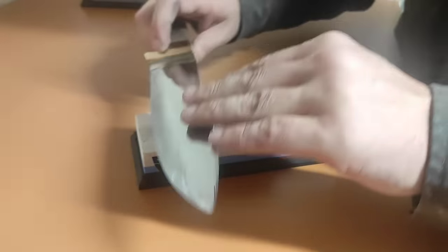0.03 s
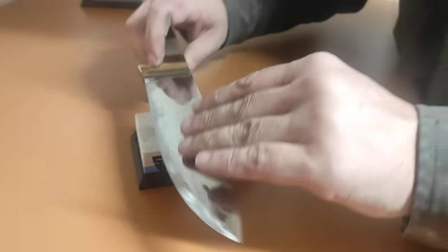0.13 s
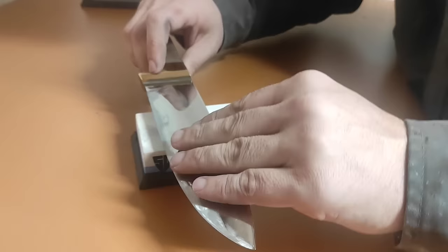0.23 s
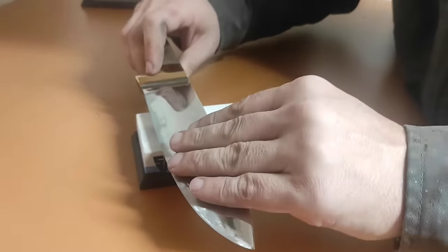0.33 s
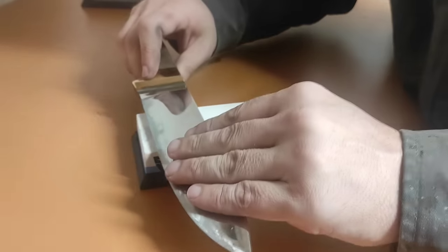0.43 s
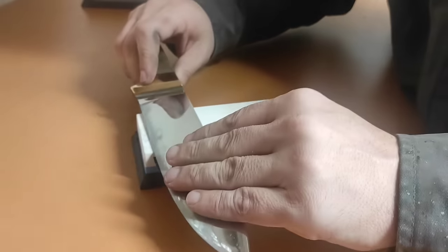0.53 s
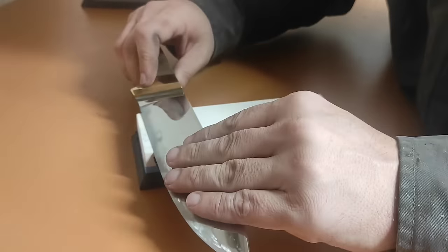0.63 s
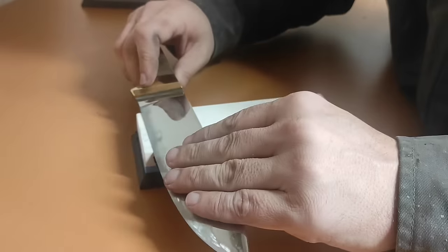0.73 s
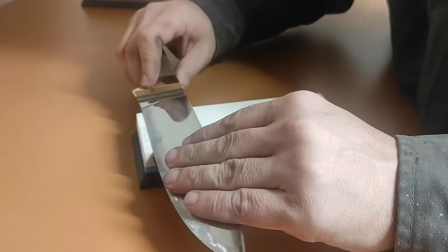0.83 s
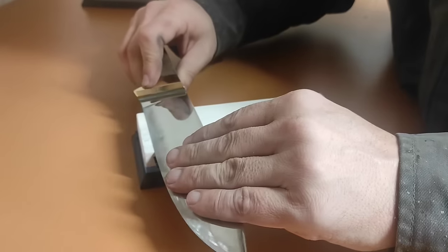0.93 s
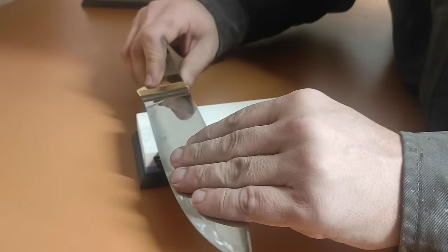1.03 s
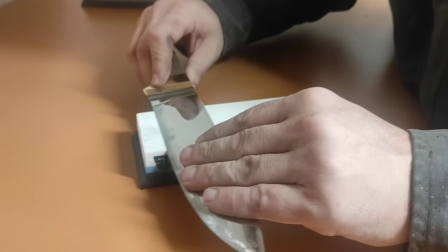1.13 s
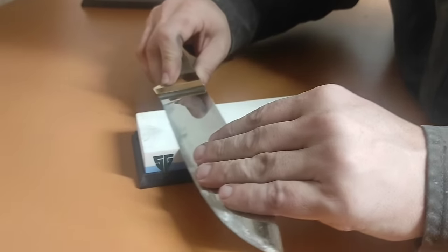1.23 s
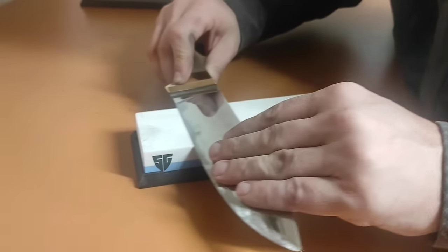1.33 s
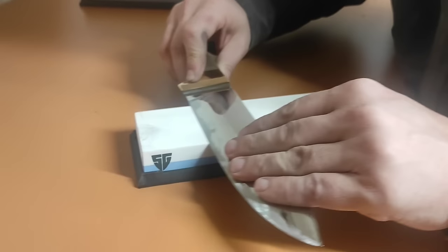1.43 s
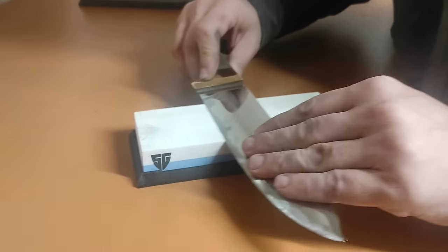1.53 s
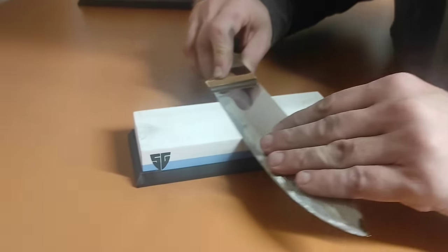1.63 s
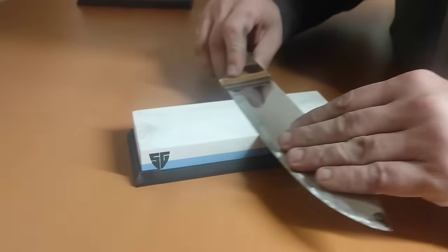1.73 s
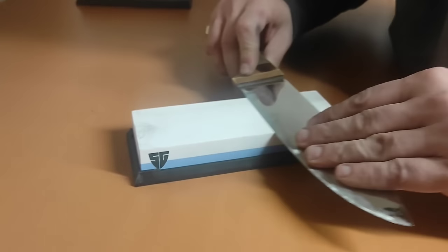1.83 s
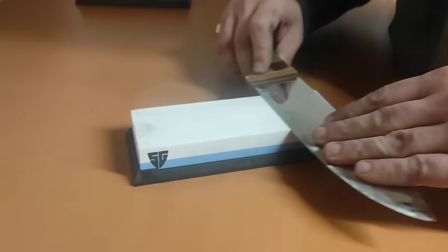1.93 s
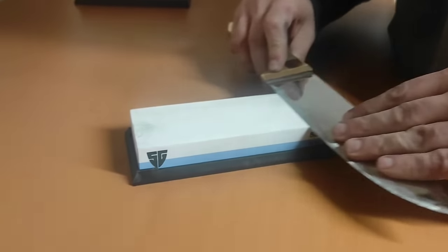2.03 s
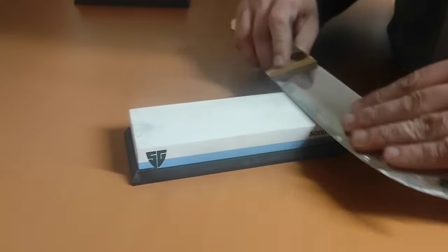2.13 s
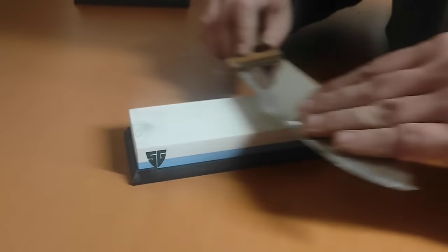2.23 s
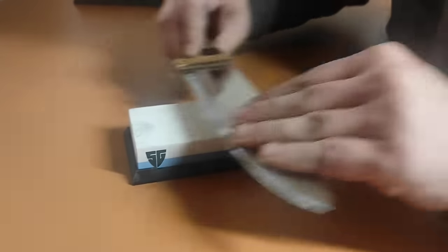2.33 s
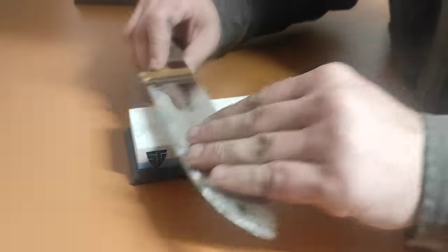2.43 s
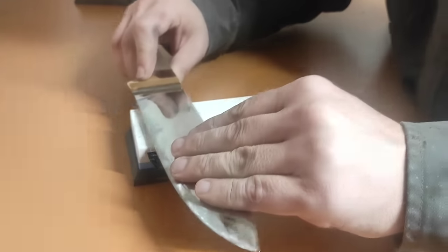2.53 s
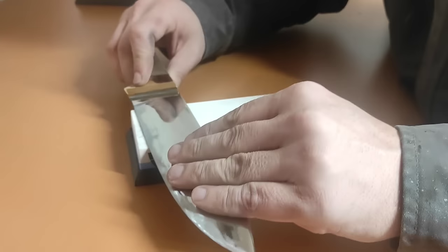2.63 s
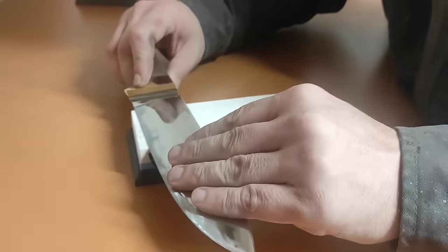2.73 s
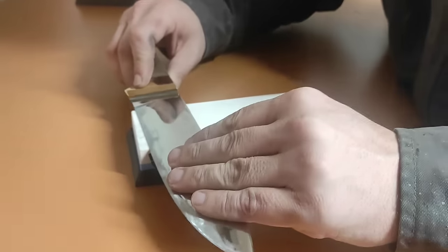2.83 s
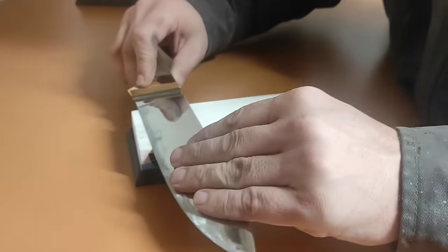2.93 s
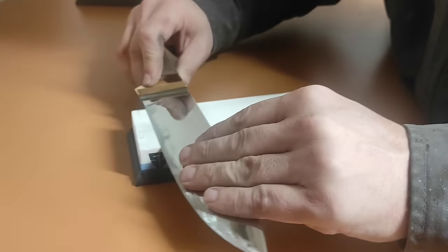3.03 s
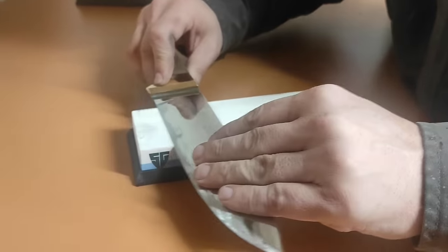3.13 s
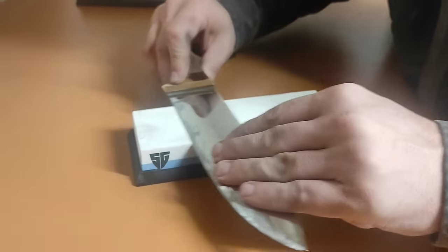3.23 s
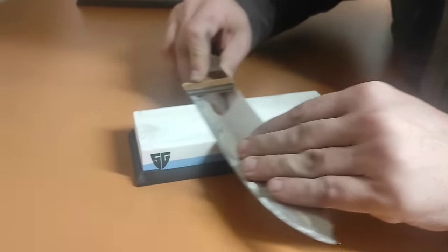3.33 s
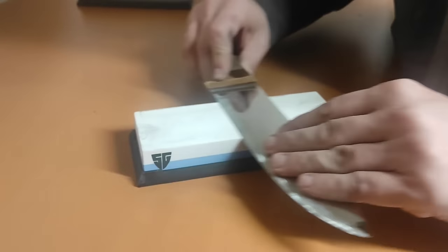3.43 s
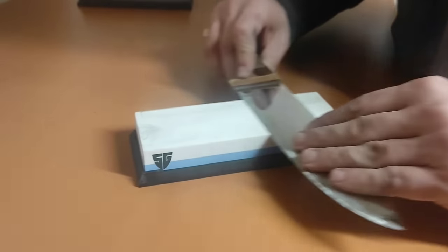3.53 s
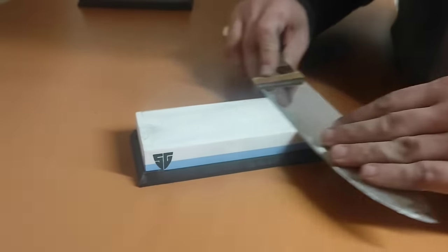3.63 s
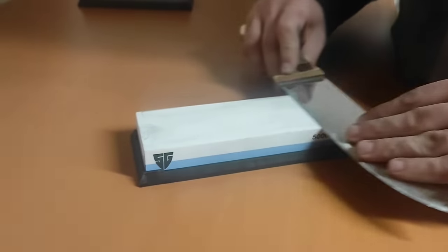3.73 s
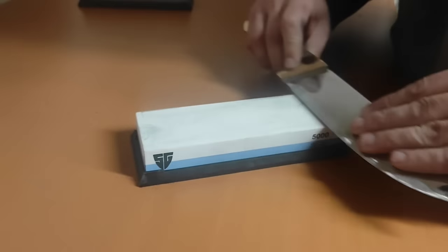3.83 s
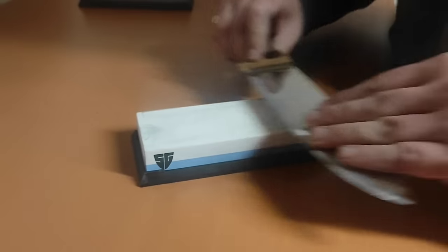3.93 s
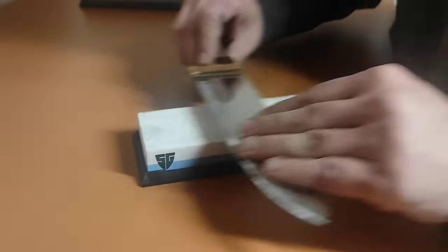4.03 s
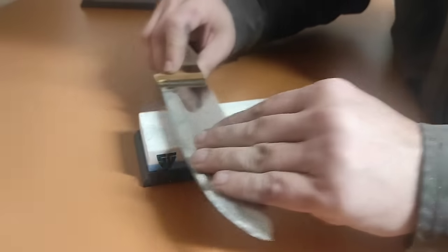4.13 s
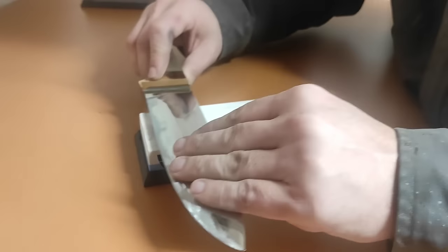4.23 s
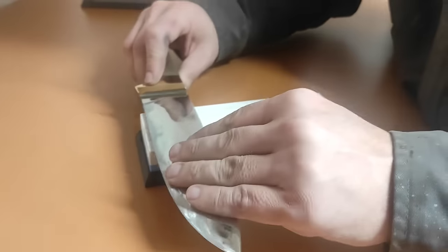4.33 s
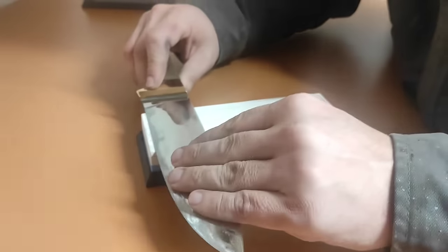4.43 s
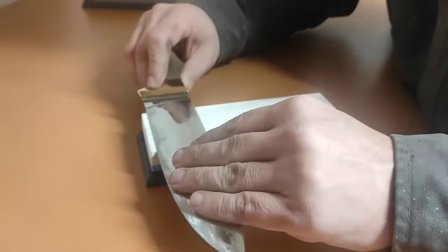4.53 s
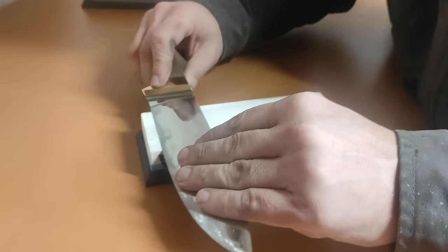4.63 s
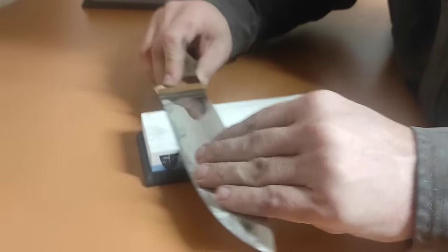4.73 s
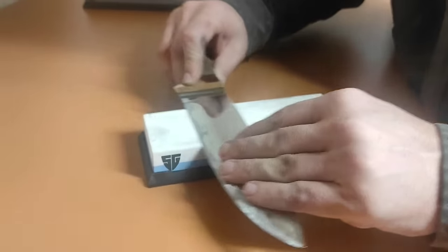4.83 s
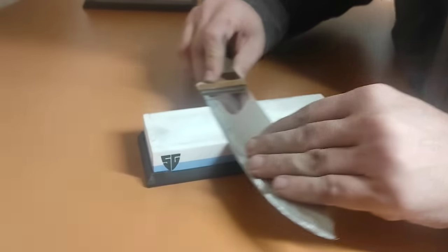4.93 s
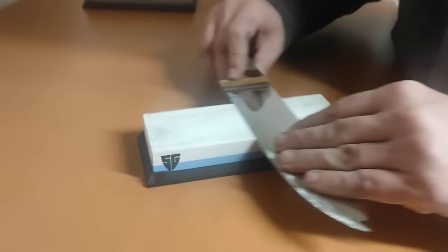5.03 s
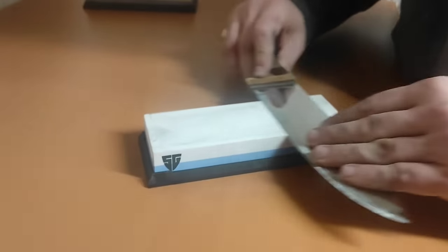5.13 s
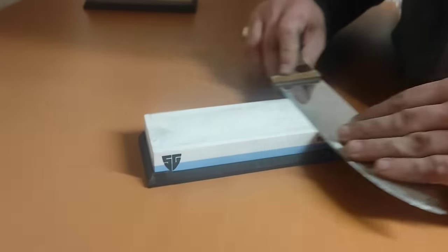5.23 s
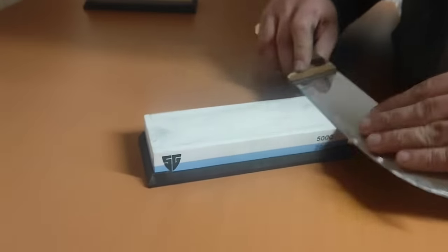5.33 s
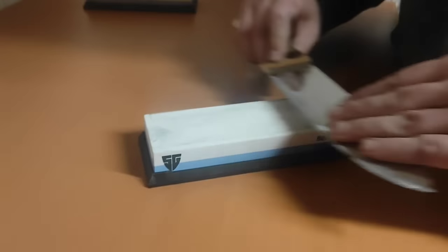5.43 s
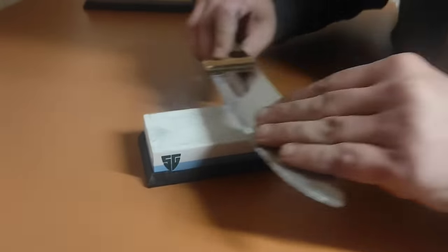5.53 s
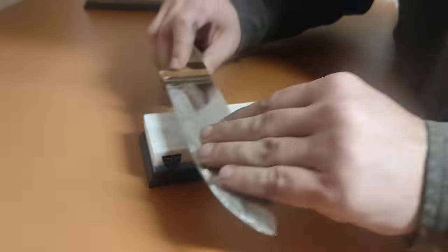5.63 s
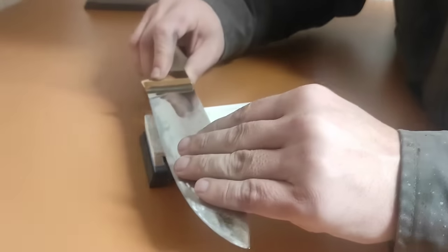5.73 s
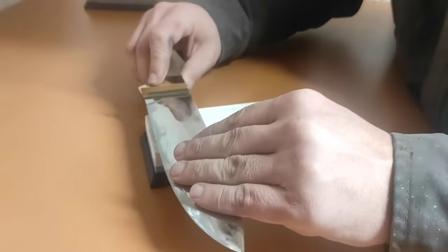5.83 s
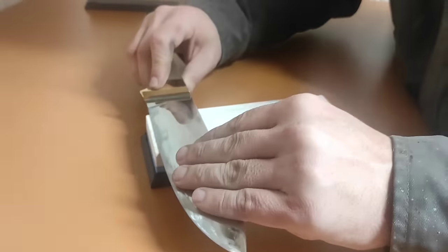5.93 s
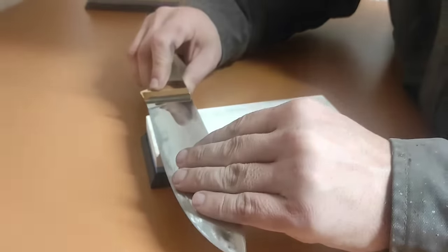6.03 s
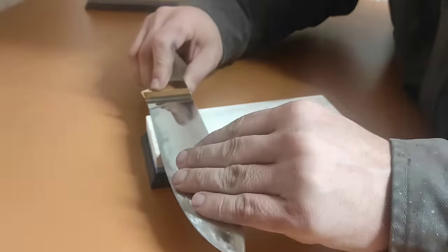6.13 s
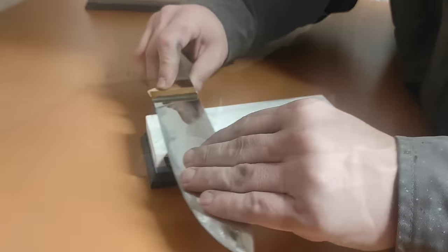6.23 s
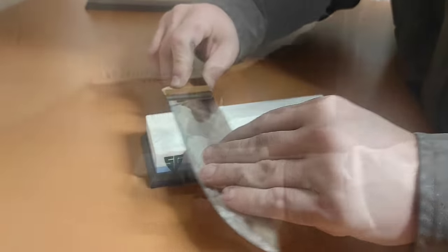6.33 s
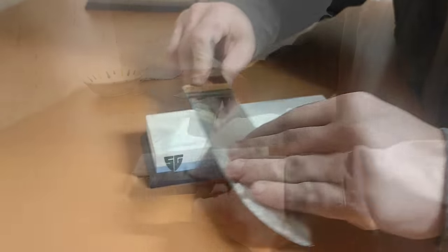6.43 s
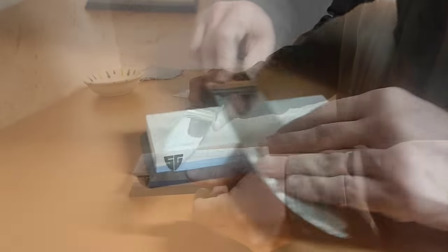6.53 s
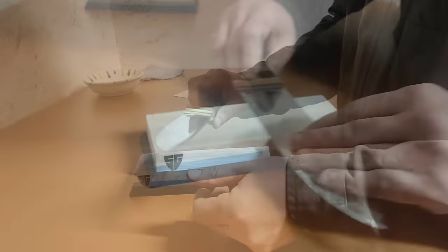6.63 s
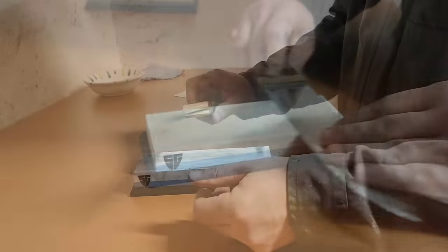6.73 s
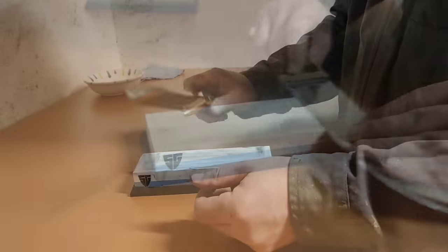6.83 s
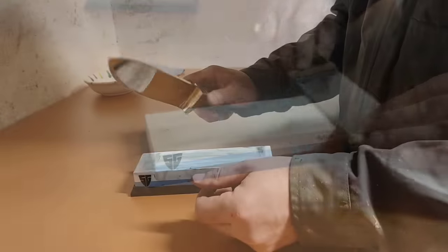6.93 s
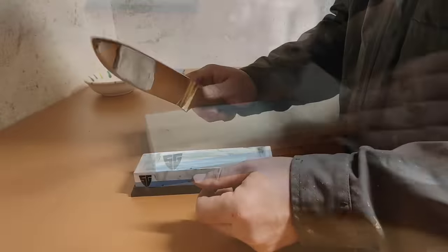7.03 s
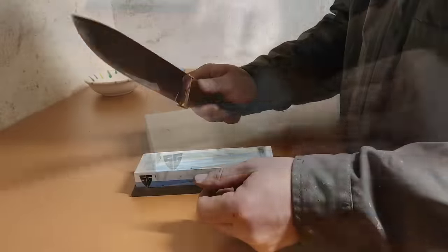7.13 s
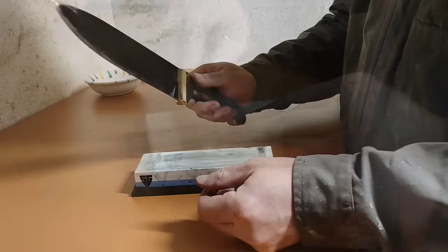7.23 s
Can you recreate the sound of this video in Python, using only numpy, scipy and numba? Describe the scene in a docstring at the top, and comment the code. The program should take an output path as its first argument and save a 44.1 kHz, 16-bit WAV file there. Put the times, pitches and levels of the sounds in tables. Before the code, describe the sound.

Close stereo view of knife sharpening at a table in a still room. After a short low wooden shudder and light finger taps, four steel-on-stone strokes of about a second each swell into high, wavering ringing hiss. Between them come quiet sleeve rustle and clear clacks as the blade is set back on the stone. The first stroke is longest, with a thin squeak midway; the last lifts off softly.

```python
"""First a stone's base judders briefly on a wooden table in a quiet small room; then soft brushing and knocks.
A large knife is drawn four times across the whetstone, with a bright, singing scrape.
Grit noise excites blade resonances that shift as the contact travels from heel to tip; damped modes make
the knocks and taps. The table rumbles as filtered noise and hums in wavering tones; brushing is coloured noise.
Two microphone ports close by hear the sources, the knife with a short diffuse reverberation."""
import sys
import numpy as np
from scipy import signal
from scipy.fft import rfft, irfft
from scipy.io import wavfile
from scipy.ndimage import map_coordinates
from numba import njit

SR = 44100
rng = np.random.default_rng(int(sys.argv[2]) if len(sys.argv) > 2 else 0)


def dump(signal):
    """Clip the signal to [-1, 1] and save it as 16-bit WAV at the path in sys.argv[1]."""
    limited = np.clip(np.atleast_2d(signal).T, -1, 1)
    pcm = np.round(limited * 32767).astype(np.int16)
    wavfile.write(sys.argv[1], SR, pcm)


N = 321930
TIME = np.arange(N) / SR

# All levels are relative: the functions weight the layers further. Resonance frequencies are nominal.
# Still air of the room: f/Hz, level/dB
AIR_SPECTRUM = [(20, 3.5), (37, -3), (50, -14), (66, -0.5), (120, -22.5), (250, -25), (500, -19),
                (1000, -31), (2500, -36), (8000, -38), (11000, -45), (15000, -67)]
# Low rumble that hands and arms stir in the table: t/s, level/dB; then its spectrum: f/Hz, level/dB
HAND_LEVELS = [(0, -54), (.8, -67.5), (2.4, -58.5), (4.2, -62), (5.7, -59.5), (6.85, -75), (7.3, -68)]
HAND_SPECTRUM = [(40, -5.5), (70, 1.5), (120, -16.5), (195, 3), (290, -2.5), (450, -15.5), (1000, -23.5),
                 (3000, -40), (12000, -73)]
# Soft brushing: sleeves and fingers between strokes, and the edge rubbing faintly as it settles on the stone:
# start t/s, end t/s, level/dB; then its spectrum: f/Hz, level/dB
BRUSHES = [(0.094, 0.493, -72.5), (0.835, 0.9, -68.5), (2.201, 2.628, -63.5), (2.477, 2.5, -64.5),
           (2.696, 2.88, -70.5), (3.9, 4.308, -64.5), (4.143, 4.26, -66.5), (4.473, 4.572, -59),
           (5.412, 5.847, -64), (6.013, 6.1, -67.5), (7.07, 7.3, -73.5)]
BRUSH_SPECTRUM = [(60, -30), (200, -8), (450, 1), (900, 1), (2200, 1.5), (3200, -4.5), (5000, -1),
                  (7000, -2), (8800, 0), (11000, -14.5), (15000, -36)]
BRUSH_RISE_S, BRUSH_SAG_DB_PER_S, BRUSH_RELEASE_DB_PER_S = 0.019, 15, 193

# Resonances of the table under the stone: f/Hz, nominal width/Hz, level/dB
TABLE_RESONANCES = [(94.2, 7.2, 2), (158, 76, 1), (190.6, 8.3, 7.5), (253.4, 44, -1.5), (298.2, 11, 4),
                    (393, 102, -12), (450, 12, -39), (746, 44, -10), (859, 24, -12.5), (1101, 137, -11)]
# Judders of the stone's base, and last the knife tip's thud on the table as it leaves the stone, # each full
# between two moments: start t/s, end t/s, hum level/dB, rattle level/dB
JUDDERS = [(0.0, 0.033, -31, -37.5), (4.915, 4.956, -40, -42.5), (5.328, 5.353, -47, -64)]
JUDDER_RISE_DB_PER_S, JUDDER_FALL_DB_PER_S = 215, 128
# Tones of the juddering table, the first the hum, the rest the rattle: mean f/Hz, level/dB
JUDDER_TONES = [(188, 4), (294, -3), (378, -17.5), (695, -22), (770, -18), (875, -21), (1030, -24.5)]
# Rubbing of the juddering base: f/Hz, level/dB
RUB_SPECTRUM = [(100, -2), (240, 2.5), (350, -1.5), (480, -15), (900, -13.5), (2000, -23), (5000, -35.5),
                (12000, -45)]

# Knocks, bounces and ticks of the blade, and taps of the fingers: t/s, knock level/dB, thump level/dB,
# tick level/dB, the spot's own ring f/Hz, clatter time t/s, own ring level/dB, treble cut-off f/Hz,
# lean between ports (positive to the left)
KNOCKS = [(0.31, -80, -71, -59, 1160, 0.0044, -7, 5000, -8),
          (0.552, -66, -52, -88, 790, 0.0033, -2, 1200, 2),
          (0.681, -46, -49.5, -62, 1130, 0.0052, 1.5, 1400, 5),
          (0.873, -88, -72, -53, 1230, 0.0054, -5, 4940, -4),
          (0.911, -97, -87, -56, 1160, 0.0036, 7, 5050, -11),
          (2.717, -29, -46, -53, 955, 0.0038, -20, 5500, 1),
          (2.741, -36, -55, -75, 1890, 0.0048, -4, 4000, -7),
          (2.878, -41.5, -38.5, -52.5, 2224, 0.006, -7.5, 1550, 0),
          (4.479, -26, -49.5, -41, 1207, 0.0044, -20, 5500, -5.5),
          (4.555, -59, -54, -48.5, 1230, 0.0035, -4, 5000, 2),
          (5.897, -54.5, -72, -93, 976, 0.0023, -5, 900, 2),
          (5.9368, -50.5, -48.5, -69, 960, 0.00086, -22, 1990, 15),
          (6.008, -36, -54, -56.5, 970, 0.004, -5.5, 1700, 0),
          (6.170, -72, -78, -56, 2250, 0.0049, -3, 4960, -1)]
# Struck modes of blade and stone, table, free blade, whole table top: f/Hz, level/dB, t60/s
KNOCK_MODES = [(520, 6.5, 0.057), (970, 2.5, 0.075), (1050, 0, 0.0088), (1264, -3.5, 0.018),
               (1690, 0, 0.051), (2220, 9.5, 0.025), (2454, 4, 0.029), (2866, 6, 0.065), (3715, 2, 0.06)]
THUMP_MODES = [(193, -4.5, 0.19), (308, 4, 0.06), (386, 0, 0.057)]
TICK_MODES = [(4960, -3, 0.076), (5330, -1, 0.036), (6140, 1, 0.05), (6480, -2.5, 0.052),
              (7310, -4.5, 0.07), (8420, -4, 0.07)]
BOOM_MODES = [(97.7, -1.1, 0.53), (135.4, -0.41, 0.51)]
# Spectra of the tick and of the base's dry click on the table: f/Hz, level/dB
TICK_SPECTRUM = [(1500, -10.5), (3600, -17), (4500, -11), (5400, -8.5), (6800, -1), (8500, 0),
                 (11000, -18.5), (15000, -42)]
CLICK_SPECTRUM = [(60, -12), (200, 15), (350, 1), (600, -8), (1100, -5), (2000, -14), (3700, -23.5),
                  (6000, -35)]
# Small bounces after a hit: level against the hit, decay time, unevenness
BOUNCE_DB, BOUNCE_S, BOUNCE_SPREAD_DB = -27.5, 0.012, 5.5
BOOM_DB, BOOM_RISE_S = -32.5, 0.01  # swing of the table top: offset from the knock level, build-up
MODE_DETUNE = 0.0108  # spread of mode frequencies from hit to hit, as a share

# Squeal midway through the first stroke: t/s, f/Hz, level/dB
SQUEAL_CURVE = [(1.45, 4210, -68), (1.487, 4170, -50), (1.53, 4220, -59), (1.563, 4180, -41),
                (1.6, 4070, -49), (1.65, 4230, -66)]
SQUEAL_WAVER, SQUEAL_STUTTER_DB = 0.011, 8  # share of its pitch; swing before levelling

# Tip rasping over the stone's edge: spectrum f/Hz, level/dB; then resonances f/Hz, nominal width/Hz, level/dB
RASP_SPECTRUM = [(100, -28), (250, -11), (500, 5.5), (850, 9.5), (1500, -1), (2150, 1.5), (2900, 6.5),
                 (3400, -25), (4000, 13), (5200, 3), (7500, 3), (8500, 8), (15000, -15)]
RASP_RESONANCES = [(995, 60, -6), (1500, 52, -2.5), (2285, 84, 13), (4556, 114, -3.5), (6770, 200, 3)]
RASP_RING_DB, RASP_IN_TABLE_DB = -1.5, -12  # ring against dry clicks; share that shakes the table

# Strokes from heel to tip: touch t/s, pressing-in time t/s, lift t/s, hiss level/dB, grinding level/dB,
# sizzle change towards the tip level/dB, tip rasp level/dB, bending resonance f/Hz, tip run-out t/s
STROKES = [(0.902, 0.32, 2.1453, -49, -55, -11, -36.5, 2200, 0.056),
           (2.877, 0.21, 3.835, -47.5, -52, 3.5, -44.5, 2273, 0.046),
           (4.51, 0.25, 5.374, -49.5, -56, 3, -40.5, 2324, 0.052),
           (6.051, 0.25, 6.955, -50, -61, -4, -73, 2318, 0.035)]
# Singing resonance, wandering with contact point and fingers, one curve a stroke: t/s, f/Hz, level/dB
SINGING_CURVES = [
    [(0.93, 6700, -61), (0.98, 6620, -54), (1.03, 6840, -53), (1.32, 6836, -37.5), (1.51, 6650, -43),
     (1.66, 6850, -41), (1.75, 6530, -39), (1.93, 6860, -38.5), (2.04, 6790, -39.5), (2.11, 6630, -42.5)],
    [(2.91, 6500, -51), (2.95, 6400, -50.5), (3.11, 6670, -49), (3.16, 7090, -40), (3.37, 6860, -38),
     (3.42, 7300, -41.5), (3.55, 6720, -39), (3.67, 7050, -34.0), (3.77, 7020, -38)],
    [(4.59, 6790, -56.5), (4.81, 7290, -40), (4.84, 7070, -44), (4.89, 6840, -37), (5.0, 6940, -39.5),
     (5.04, 7000, -46), (5.08, 6460, -37), (5.25, 7210, -38), (5.33, 7090, -40)],
    [(6.1, 6220, -67), (6.15, 6600, -69), (6.26, 6850, -44.5), (6.35, 7550, -36.5), (6.39, 6670, -40),
     (6.46, 6440, -42), (6.52, 6920, -35), (6.58, 6650, -41.5), (6.81, 6340, -43), (6.92, 7190, -47.5)],
]
# Second bending resonance, sliding with finger pressure, one curve a stroke: t/s, f/Hz, level/dB
SECOND_CURVES = [
    [(0.98, 4500, -82), (1.016, 4500, -64), (1.37, 4430, -60), (1.5, 4230, -56), (1.62, 4270, -51),
     (1.7, 4450, -48), (1.82, 4420, -49.5), (1.9, 4510, -46.5), (2.1, 4550, -47)],
    [(2.95, 4480, -53), (3.016, 4730, -48), (3.38, 4720, -56), (3.466, 4700, -51), (3.662, 4660, -51),
     (3.72, 4860, -51), (3.8, 4400, -39)],
    [(4.6, 4820, -63), (4.64, 4740, -53), (4.77, 5040, -57.5), (4.85, 4580, -51.5), (4.95, 4780, -55.5),
     (5.094, 4700, -44), (5.22, 4920, -49), (5.33, 4870, -40)],
    [(6.17, 4530, -75), (6.214, 4670, -53), (6.35, 4950, -54), (6.38, 4680, -46.5), (6.478, 4420, -47),
     (6.52, 4700, -49), (6.7, 4530, -46.5), (6.812, 4540, -42), (6.92, 4800, -56)],
]
# Core and skirt of those two resonances: width of each filter/Hz, level/dB
SING_SHAPE = [(340, -1), (1600, -18)]
SECOND_SHAPE = [(330, -2), (1200, -14)]
# Pressed blade at BEND_HZ, low, upper and short bending waves: f/Hz, nominal width/Hz, level/dB
BLADE_LOW = [(1010, 112, -5.5), (1583, 93, -5), (2229, 96, 4.5), (2424, 55, 4), (3000, 114, -3.5)]
BLADE_MID = [(5030, 190, -8)]
BLADE_HIGH = [(6330, 38, -0.5), (7855, 190, 1), (8680, 250, 2.5), (8967, 105, 1), (10610, 77, -5.5),
              (11430, 380, -13), (12600, 250, -25), (14100, 240, -19), (15760, 400, -17.5)]
# Stone and held heel, whose resonances do not follow the bend: f/Hz, nominal width/Hz, level/dB
STONE_RESONANCES = [(2990, 88, -5), (3350, 64, -13), (3723, 70, -1), (5540, 99, -13), (6200, 33, -10)]
# Broad noise of the grit and snap of the larger grains: f/Hz, level/dB
GRIT_SPECTRUM = [(200, -23), (400, 0.5), (900, -10.5), (1800, -14), (2350, 15), (2700, -27), (3300, -23),
                 (5000, -27.5), (12000, -33)]
SNAP_SPECTRUM = [(400, -20), (1500, -4.5), (3000, -6), (5500, 1.5), (9000, -4.5), (15000, -8)]
# Bending waves back from heel, tip and fingers, at BEND_HZ: round trip t/s, gain
RETURNS = [(.0021, 0.19), (.0037, -0.56), (.0058, 0.28), (.0093, -0.29), (0.0141, 0.34), (0.0212, -0.45)]
BEND_HZ, FREE_BEND_HZ, FREE_SING_HZ = 2302, 2083, 6360  # reference bend; the freed blade's resonances
FREE_S = 0.036  # time before the lift over which the bend glides to its free value
TOUCH_S, RELEASE_DB_PER_S = 0.093, 496
ATTACK_DB, ATTACK_CURVE = 17, 1.32  # pressure builds from ATTACK_DB below full
HISS_RISE_DB, BRIGHTEN_CURVE = 3.5, 9.9  # heel to tip; how late the sizzle changes
BELLY_AT, BELLY_WIDTH, BELLY_DB = 0.7, 0.23, 5.5  # shares of the stroke; dip in the grinding
SING_HZ, BEND_FOLLOWS = 6754, 0.38  # singing pitch at which the bend has its stroke's value; power of the ratio
STREAK_LOW_HZ, STREAK_HIGH_HZ, STREAK_WIDTH_HZ = 3818, 6058, 35
CRUNCH_DB = 10  # swing of the larger grains
GRIT_SHARED = 0.2  # share of the power alike at both ports
LEFT_LAG_S = 0.000136  # the stone lies to the right

# Right port against the left, resonant near 7 kHz: f/Hz, level/dB
RIGHT_PORT = [(60, -2.5), (200, -6.5), (600, -4.5), (2200, -2.5), (3200, 1), (5200, 0.5), (6200, 7),
              (6900, 11), (7400, 10), (8300, 2), (9200, 4.5), (11000, 1), (14000, 3.5)]
PORT_NOTCH_HZ, PORT_NOTCH_WIDTH_HZ, TOP_HZ = 9766., 1730., 15450
OPPOSITE = np.array([[1], [-1]])  # signs of left and right


def undb(db):
    """Logarithmic level: decibels become an amplitude ratio."""
    return 10 ** (np.asarray(db) / 20)


def unit(x):
    """Normalisation of mean power: scale to rms 1."""
    return x / np.sqrt(np.mean(x ** 2))


def since(moment_s):
    """Elapsed time: seconds after a moment, 0 before it."""
    return np.maximum(TIME - moment_s, 0)


def until(moment_s):
    """Remaining time: seconds before a moment, 0 after it."""
    return np.maximum(moment_s - TIME, 0)


def follow(curve):
    """Linear interpolation: pitch and level at every sample."""
    times, hz, db = np.transpose(curve)
    return np.interp(TIME, times, hz), np.interp(TIME, times, db)


def walk(rate):
    """Random modulation: linear ramps between rate new values a second, with rms 1."""
    knots = rng.standard_normal(N // 10)
    return unit(np.interp(TIME * rate, np.arange(len(knots)), knots))


def colour(x, points):
    """Minimum-phase filtering: the folded cepstrum gives a causal response through the points."""
    hz, db = np.transpose(points)
    size = 4096
    bins = np.maximum(np.fft.rfftfreq(size, 1 / SR), 1)
    gain = undb(np.interp(np.log(bins), np.log(hz), db))
    cepstrum = irfft(np.log(gain))
    cepstrum[1:size // 2] *= 2
    cepstrum[size // 2 + 1:] = 0
    response = irfft(np.exp(rfft(cepstrum)))
    return signal.fftconvolve(np.atleast_2d(x), response[None], axes=1)[:, :x.shape[-1]]


@njit
def bandpass(x, hz, width):
    """Simple resonance: a state-variable band-pass whose centre may move every sample."""
    y = np.empty_like(x)
    g = np.tan(np.pi * hz / SR)
    k = np.pi * width / SR * (g + 1 / g)
    for c in range(len(x)):
        band, low = 0., 0.
        for i in range(x.shape[1]):
            v = (band + g[i] * (x[c, i] - low)) / (1 + g[i] * (g[i] + k[i]))
            band, low, y[c, i] = 2 * v - band, low + 2 * g[i] * v, k[i] * v
    return y


def steep(x, hz, width):
    """Cascaded resonance: two equal band-passes steepen the flanks."""
    return bandpass(bandpass(x, hz, width), hz, width)


def resonate(x, modes, shift, sway_db):
    """Modal superposition: resonances scaled by shift, each swelling and fading on its own."""
    total = 0
    for hz, width, db in modes:
        centre = np.minimum(hz * shift * np.ones(N), .45 * SR)
        total = total + undb(db + sway_db * walk(rate=12)) * steep(x, centre, 2. * width)
    return total


def ring(modes, t):
    """Impulse response: damped modes answer one tap."""
    return sum(undb(db - 60 * t / t60) * np.sin(2 * np.pi * hz * t) for hz, db, t60 in modes)


def grains(spread_db):
    """Incoherent excitation: dense clicks of uneven size, with unrelated phases at the two ports."""
    return unit(rng.standard_normal((2, N)) * undb(spread_db * walk(rate=2500)))


def ports(points, spread_db):
    """Frequency-dependent coherence: coloured noise mostly alike in the bass, unrelated in the treble."""
    mid, side = grains(spread_db)
    side = colour(side, [(150, -10.0), (700, 2.0), (1600, 0.0)])
    return unit(colour(mid + side * OPPOSITE, points))


def air():
    """Stationary background noise: the still room."""
    return undb(-66.5) * ports(AIR_SPECTRUM, spread_db=-2.0)


def hands():
    """Structure-borne noise: hands and arms stir a low rumble in the table."""
    stir = undb(1.7 * walk(rate=14))
    level = undb(np.interp(TIME, *np.transpose(HAND_LEVELS)))
    return ports(HAND_SPECTRUM, spread_db=0.5) * stir * level


def brush_gain():
    """Envelope of friction: each brush sets in, sags and stops."""
    gain = 0
    for start, end, db in BRUSHES:
        fall_db = BRUSH_SAG_DB_PER_S * since(start) + BRUSH_RELEASE_DB_PER_S * since(end)
        gain = gain + np.minimum(since(start) / BRUSH_RISE_S, 1) * undb(db - fall_db)
    return gain


def brushing():
    """Friction noise: sleeves and fingers between strokes, and the edge rubbing faintly as it settles."""
    flicker = undb(1.3 * walk(rate=40))
    return undb(-1.0) * ports(BRUSH_SPECTRUM, spread_db=1.5) * flicker * brush_gain()


def juddering():
    """Growth and decay: gains of hum and rattle as each judder swells, holds and dies away."""
    gains = 0
    for start, end, hum_db, rattle_db in JUDDERS:
        loss_db = JUDDER_RISE_DB_PER_S * until(start) + JUDDER_FALL_DB_PER_S * since(end)
        gains = gains + undb(np.array([[hum_db], [rattle_db]]) - loss_db)
    return gains


def table(drag):
    """Forced vibration: grinding rumbles in the table's modes; a juddering base or the tip's thud makes it hum
    and rattle."""
    rumble = unit(resonate(rng.standard_normal((1, N)), TABLE_RESONANCES, 0.99, sway_db=3.0)) * drag
    tones = []
    for hz, db in JUDDER_TONES:
        turns = np.cumsum(hz * (1 + 0.0146 * walk(rate=40))) / SR
        swell = undb(db + 2.5 * np.tanh(walk(rate=26)))
        tones.append(swell * np.sin(2 * np.pi * turns))
    hum = unit(tones[0])
    rattle = unit(sum(tones[1:])) + undb(-3) * ports(RUB_SPECTRUM, spread_db=1.5)
    hum_gain, rattle_gain = juddering()
    return undb(-3.0) * rumble + undb(-3.5) * hum * hum_gain + undb(-8.5) * rattle * rattle_gain


def struck(push, response):
    """Convolution principle: a contact force drives an impulse response."""
    return unit(signal.fftconvolve(push, np.atleast_2d(response), axes=1)[:, :push.shape[1]])


def knocks():
    """Impact excitation: each brief contact of blade or finger mixes a tick, a ring and a table thump."""
    out = np.zeros((2, N + SR))
    t = np.arange(SR // 2) / SR
    wood = unit(ring(THUMP_MODES, t)) + unit(colour(signal.unit_impulse(len(t)), CLICK_SPECTRUM))
    crack_spectrum = [(200, -26.0), (550, 4.5), (1000, 11.5), (1600, -1.0),
                      (2600, 6), (4300, -21.0), (12000, -53)]  # f/Hz, level/dB
    for start, knock_db, thump_db, tick_db, ring_hz, clatter_s, ring_db, soft_hz, lean in KNOCKS:
        age = t / max(clatter_s, 1 / SR)
        # a main push, then a faint uneven tail
        bounces = unit(undb(BOUNCE_SPREAD_DB * np.tanh(walk(rate=364)[:len(t)])))
        force = (age * np.exp(-age ** 2 / 2) + undb(BOUNCE_DB) * np.exp(-t / BOUNCE_S)) * bounces
        contact = rng.standard_normal((3, len(t))) * force
        push = contact[:2] + 0.5 * contact[2]  # partly shared by the ports
        crack = unit(colour(push, crack_spectrum))
        # every mode is a little detuned at each hit
        modes = [(hz * (1 + MODE_DETUNE * rng.standard_normal()), db, t60) for hz, db, t60 in KNOCK_MODES]
        # a soft hit loses its treble
        softness = signal.butter(2, min(soft_hz, SR / 4), fs=SR, output="sos")
        body = signal.sosfilt(softness, struck(push, ring(modes, t)) + undb(1) * crack)
        own_ring = unit(ring([(ring_hz, 0, .06)], t) * -np.expm1(-age))
        knock = unit(unit(body) + undb(ring_db) * own_ring)
        tick = unit(colour(push, TICK_SPECTRUM)) + undb(-3.0) * struck(push, ring(TICK_MODES, t))
        # the thump builds over the clatter time
        thump = unit(wood * -np.expm1(-age ** 2))
        # the table top's swing is proportional to the knock
        boom = unit(ring(BOOM_MODES, t) * -np.expm1(-t / BOOM_RISE_S))
        hit = knock * undb(knock_db - 23.0) + tick * undb(tick_db - 23.0) + thump * undb(thump_db - 21.5)
        hit = hit + boom * undb(knock_db + BOOM_DB)
        first = int(start * SR)
        out[:, first:first + len(t)] += hit * undb(0.23 * lean * OPPOSITE)
    return out[:, :N]


def squeal():
    """Stick-slip oscillation: the edge locks to the blade in a thin, wavering tone."""
    hz, db = follow(SQUEAL_CURVE)
    turns = np.cumsum(hz * (1 + SQUEAL_WAVER * walk(rate=260))) / SR
    stutter = unit(undb(SQUEAL_STUTTER_DB * np.tanh(walk(rate=90))))
    sounding = (TIME > SQUEAL_CURVE[0][0]) & (TIME < SQUEAL_CURVE[-1][0])
    return unit(np.sin(2 * np.pi * turns)) * stutter * undb(db) * sounding


def grit(spread_db):
    """Partial coherence: clicks under the edge, partly alike at both ports, partly scattered."""
    shared, scattered = grains(spread_db)[:1], grains(spread_db)
    return np.sqrt(GRIT_SHARED) * shared + np.sqrt(1 - GRIT_SHARED) * scattered


def returns(x, shift):
    """Comb filtering: echoes inside the blade carve ridges that glide with its free length."""
    now = np.arange(N)
    total = x
    for lag_s, gain in RETURNS:
        moments = now - SR * lag_s / shift
        total = total + gain * np.array([map_coordinates(c, [moments], order=1) for c in x])
    return total


def rasp(bend_hz):
    """Impulsive excitation: the skipping tip rings the falling bending resonances and the freed blade."""
    bend = bend_hz / BEND_HZ
    skips = undb(4 * np.tanh(walk(rate=320)))
    clicks = returns(colour(grit(spread_db=6.0) * skips, RASP_SPECTRUM), bend)
    ringing = resonate(clicks, RASP_RESONANCES, bend, sway_db=4.5)
    free = signal.fftconvolve(clicks, ring(TICK_MODES, TIME[:SR // 4])[None])[:, :N]
    return unit(unit(clicks) + undb(RASP_RING_DB) * unit(ringing) + undb(0.5) * unit(free))


def coarse_grit():
    """Brittle fracture: larger grains break under the edge in a dense, dry crunch."""
    crunch = undb(CRUNCH_DB * np.tanh(walk(rate=520)))
    return unit(colour(grit(spread_db=2.0) * crunch, SNAP_SPECTRUM))


def streaks(bend):
    """Plate modes: narrow resonances glide with the bend; the moving edge stirs now one, now another."""
    spots = np.linspace(STREAK_LOW_HZ, STREAK_HIGH_HZ, 8)
    spots = spots * (1 + .02 * rng.standard_normal(len(spots)))
    modes = [(hz, STREAK_WIDTH_HZ, 0) for hz in spots]
    wandering = bend * (1 + .008 * walk(rate=8))
    return unit(resonate(grit(spread_db=6), modes, wandering, sway_db=5.0))


def sing(x, shape, hz):
    """Gliding resonance: a core and a skirt round the same centre."""
    return sum(undb(db) * steep(x, hz, 1. * width_hz) for width_hz, db in shape)


def strokes():
    """Moving contact: pressure, travel and lift set the blade's gains and tunings through each stroke."""
    sing_gain = second_gain = hiss_gain = grind_gain = rasp_gain = bright_db = 0
    sing_hz, second_hz, bend_hz = FREE_SING_HZ, 2 * FREE_BEND_HZ, FREE_BEND_HZ
    for stroke, singing, second in zip(STROKES, SINGING_CURVES, SECOND_CURVES):
        touch, press_s, lift, hiss_db, grind_db, brighten_db, rasp_db, own_hz, tip_s = stroke
        hz, db = follow(singing)
        slide_hz, slide_db = follow(second)
        contact = np.minimum(since(touch) / TOUCH_S, 1) * undb(-RELEASE_DB_PER_S * since(lift))
        press_db = -ATTACK_DB * np.minimum(until(touch + press_s) / press_s, 1) ** ATTACK_CURVE
        travel = np.minimum(since(touch) / (lift - touch), 1)  # 0 at the heel, 1 at the tip
        belly = np.exp(-((travel - BELLY_AT) / BELLY_WIDTH) ** 2)
        tip = np.exp(-(until(lift) / tip_s) ** 2)
        freed = np.exp(-(until(lift) / FREE_S) ** 2)
        sing_gain += contact * undb(db)
        second_gain += contact * undb(slide_db) * (1 - tip)
        hiss_gain += contact * undb(hiss_db + press_db + HISS_RISE_DB * travel)
        grind_gain += contact * undb(grind_db + press_db - BELLY_DB * belly)
        rasp_gain += contact * undb(rasp_db) * tip
        pressed_hz = own_hz * (hz / SING_HZ) ** BEND_FOLLOWS
        # tunings hold until the next touch replaces them
        begun = TIME >= touch
        bright_db = np.where(begun, brighten_db * travel ** BRIGHTEN_CURVE, bright_db)
        sing_hz = np.where(begun, hz + (FREE_SING_HZ - hz) * tip, sing_hz)
        second_hz = np.where(begun, slide_hz, second_hz)
        bend_hz = np.where(begun, pressed_hz + (FREE_BEND_HZ - pressed_hz) * freed, bend_hz)
    gains = sing_gain, second_gain, hiss_gain, grind_gain, rasp_gain
    return gains, (bright_db, sing_hz, second_hz, bend_hz)


def blade(gains, tunings):
    """Friction-driven resonance: grit catches and frees the edge; the blade rings with the contact point."""
    sing_gain, second_gain, hiss_gain, grind_gain, _ = gains
    bright_db, sing_hz, second_hz, bend_hz = tunings
    sing_hz = sing_hz * (1 + .005 * walk(rate=35))
    second_hz = second_hz * (1 + .008 * walk(rate=30))
    bend = bend_hz / BEND_HZ * (1 + .003 * walk(rate=12))
    # the edge bounces on the grit, but the fingers limit how far
    chatter = np.tanh(walk(rate=190))

    flutter = undb(0.74 * chatter + 2.0 * np.tanh(walk(rate=42)))
    singing = unit(sing(grit(spread_db=2.0), SING_SHAPE, sing_hz) * flutter)

    second = returns(sing(grit(spread_db=1.5), SECOND_SHAPE, second_hz), bend ** 0.5)
    second = unit(second * undb(2.7 * np.tanh(walk(rate=22))))

    hiss = resonate(grit(spread_db=2.0), BLADE_MID, bend, sway_db=1.0)
    hiss = hiss + undb(-10.5) * colour(grit(spread_db=0.0), TICK_SPECTRUM)
    hiss = hiss + resonate(grit(spread_db=2.0), STONE_RESONANCES, 0.99, sway_db=1.5)
    hiss = unit(returns(hiss, bend ** 0.5))

    # short waves move less with the contact
    sizzle = resonate(grit(spread_db=4.0), BLADE_HIGH, bend ** 0.5, sway_db=3.0)
    sizzle = unit(returns(sizzle, bend ** 0.66))

    grind = resonate(grit(spread_db=1.0), BLADE_LOW, bend, sway_db=3.0)
    grind = grind + undb(-23.0) * ports(GRIT_SPECTRUM, spread_db=0.5)
    grind = unit(returns(grind, bend))

    scrape = undb(-10.0) * hiss + undb(-8) * streaks(bend) + undb(-12.5) * coarse_grit()
    scrape = scrape * hiss_gain + undb(-3.0) * second * second_gain
    scrape = scrape + undb(bright_db - 1.0) * sizzle * hiss_gain ** 0.78 * sing_gain ** 0.25
    scrape = scrape + undb(2) * grind * grind_gain
    return undb(-5.5) * singing * sing_gain + scrape * undb(1.4 * chatter)


def room(x, t60_s, wet_db):
    """Diffuse reverberation: a short exponential noise tail, different at each port."""
    t = np.arange(SR // 2) / SR
    tail = rng.standard_normal((2, len(t))) * np.exp(-np.log(1000) * t / t60_s) * (t > .004)
    tail /= np.sqrt(np.sum(tail ** 2, axis=1, keepdims=True))
    return x + undb(wet_db) * signal.fftconvolve(x, tail, axes=1)[:, :N]


def scene():
    """Superposition of sources: quiet air, hands, brushing and table under the knife."""
    gains, tunings = strokes()
    _, _, hiss_gain, grind_gain, rasp_gain = gains
    left, right = blade(gains, tunings) + rasp_gain * rasp(tunings[-1]) + squeal()
    knife = np.array([np.roll(left, round(LEFT_LAG_S * SR)), right]) + knocks()
    drag = np.sqrt(hiss_gain * (grind_gain + undb(RASP_IN_TABLE_DB) * rasp_gain))
    return air() + hands() + brushing() + table(drag) + room(knife, t60_s=0.21, wet_db=-9.0)


def record(dry):
    """Port resonance and cancellation: the right port colours, both lose a band near 10 kHz and the top."""
    heard = np.vstack([dry[:1], colour(dry[1], RIGHT_PORT)])
    heard = heard - bandpass(heard, np.full(N, PORT_NOTCH_HZ), PORT_NOTCH_WIDTH_HZ)
    return signal.sosfilt(signal.ellip(10, .2, 70, TOP_HZ, fs=SR, output="sos"), heard)


dry = scene()
out = record(dry)
dump(out)
```